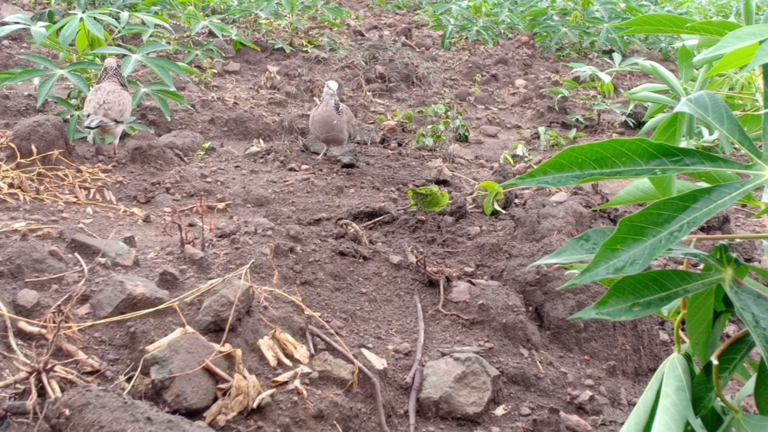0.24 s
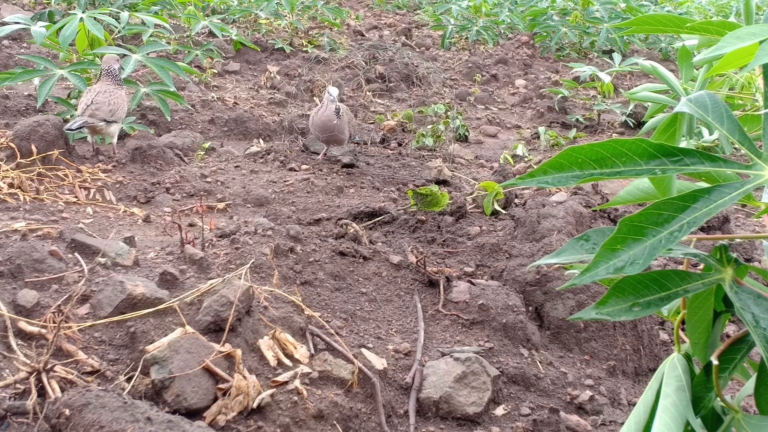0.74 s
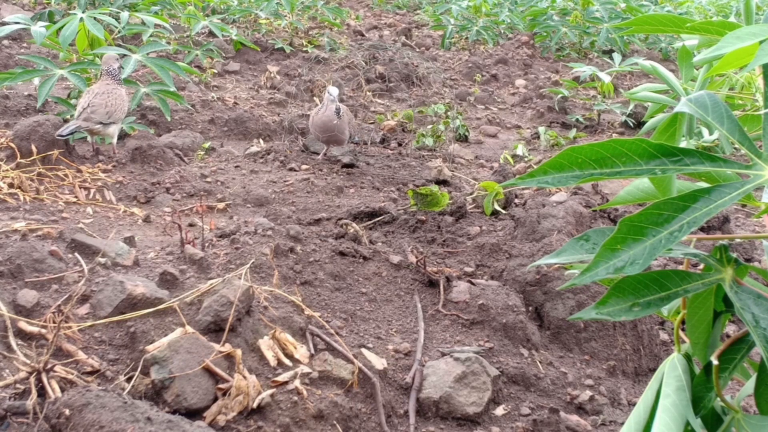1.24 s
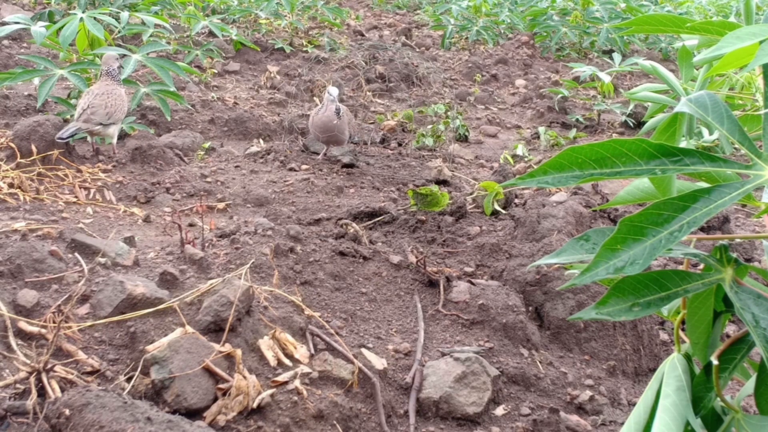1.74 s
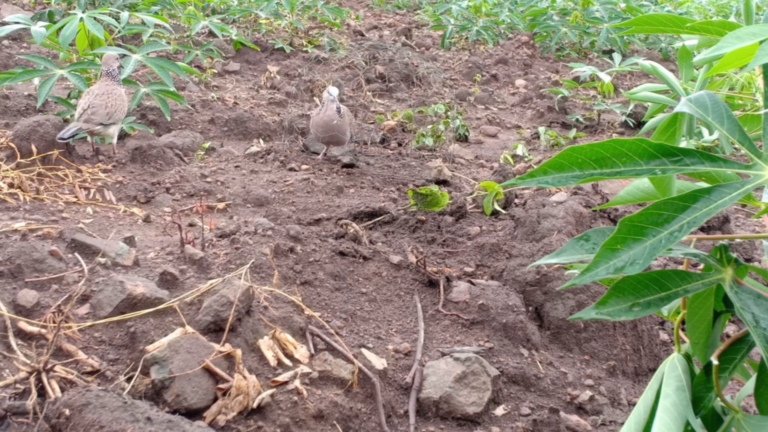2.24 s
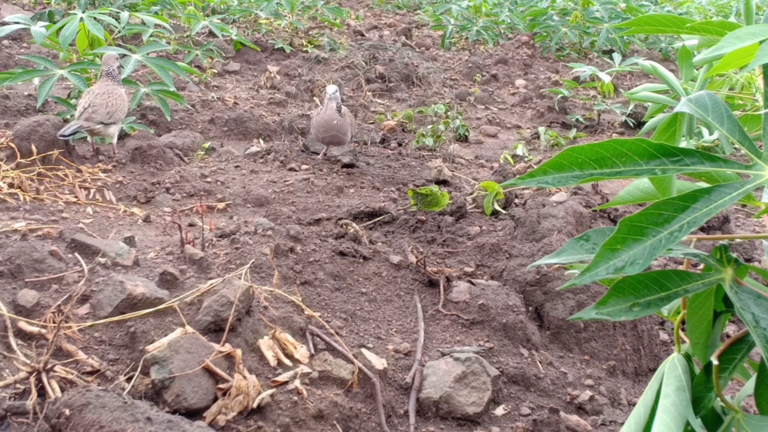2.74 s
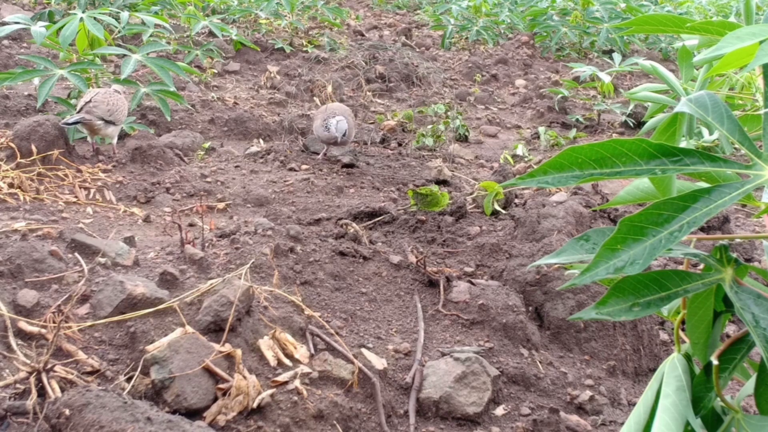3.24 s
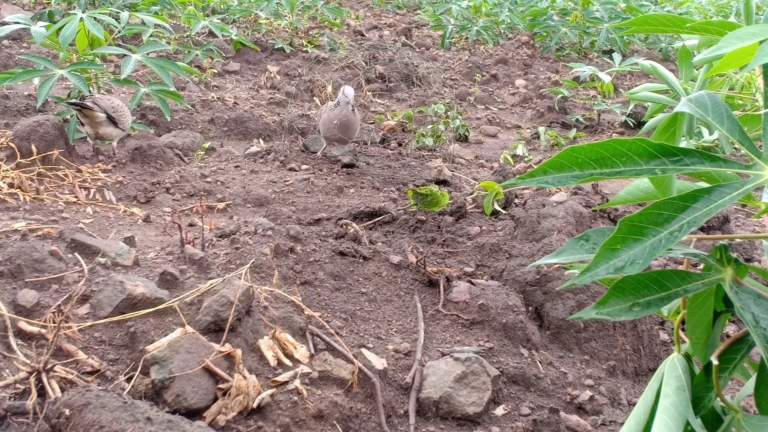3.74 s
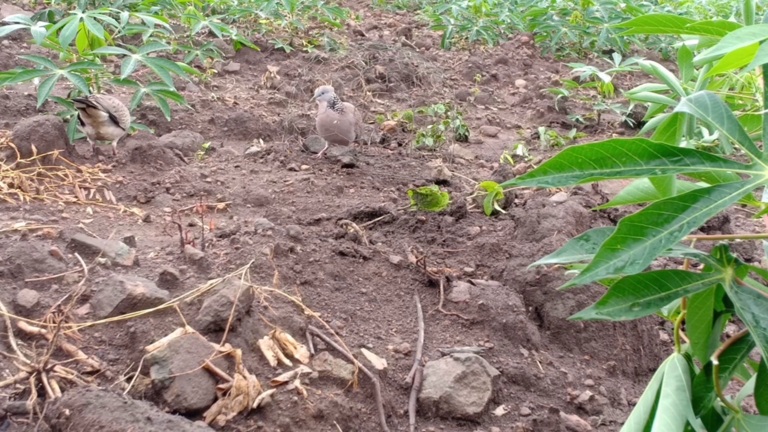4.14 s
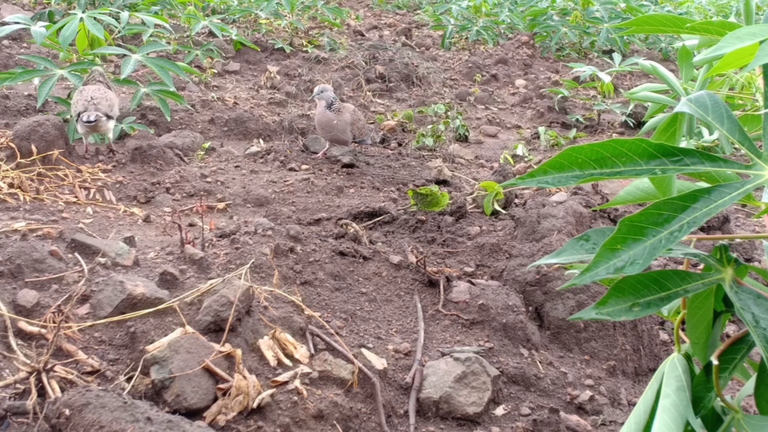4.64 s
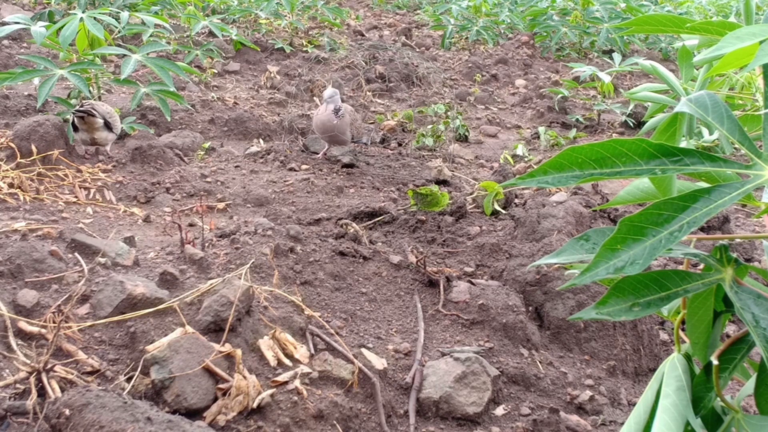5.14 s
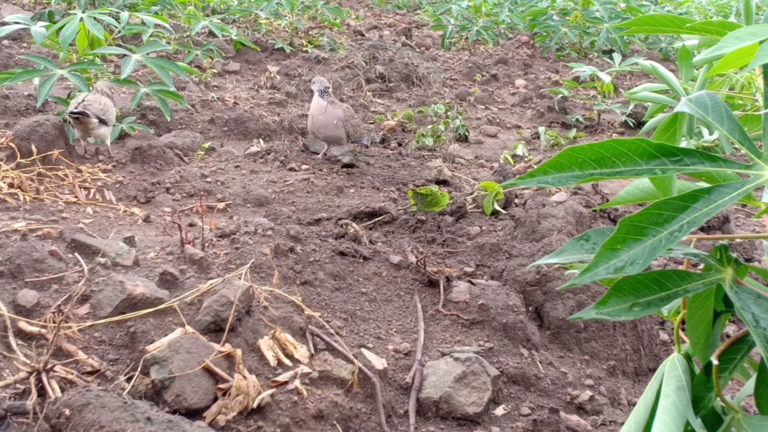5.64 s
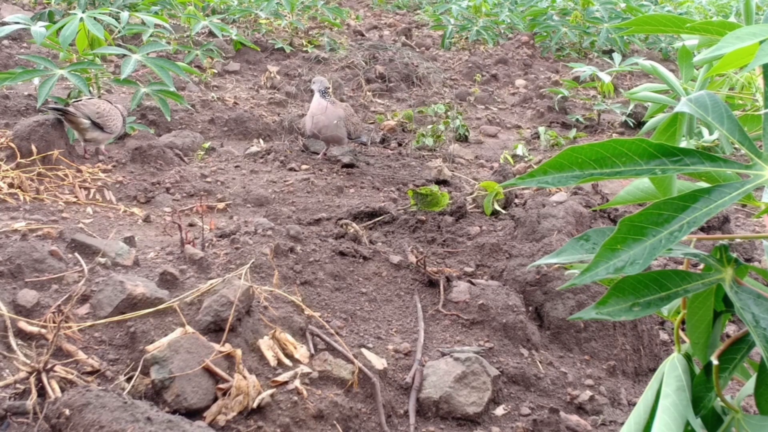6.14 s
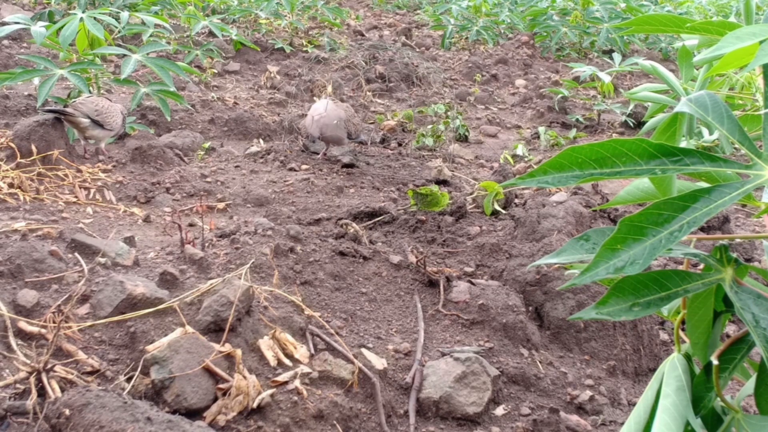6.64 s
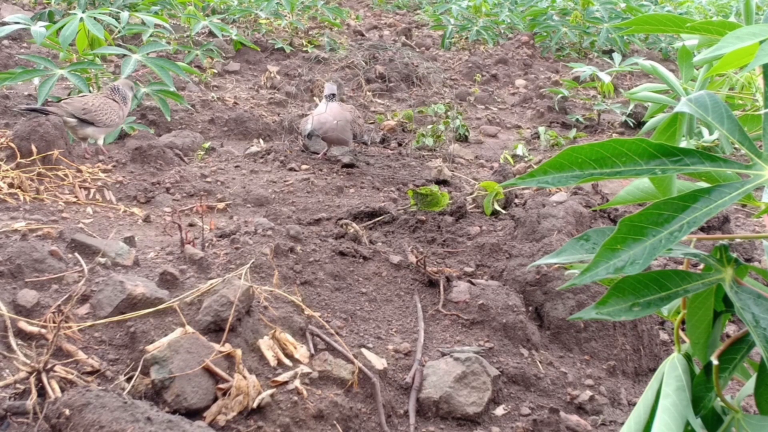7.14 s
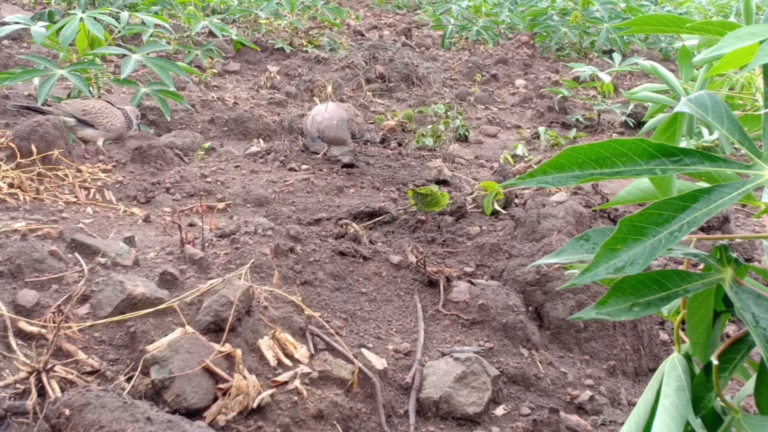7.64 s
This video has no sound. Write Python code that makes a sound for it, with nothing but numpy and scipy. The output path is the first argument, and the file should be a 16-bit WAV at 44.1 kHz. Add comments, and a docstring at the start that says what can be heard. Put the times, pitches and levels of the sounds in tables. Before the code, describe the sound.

In a quiet field, a dove a few metres from the microphone finishes a low coo. A bird further off gives a run of six falling chirps. The dove then starts again, cooing in fluttering pairs, short then long, and the falling chirps return over it near the end. Faint whistles, distant twittering and high insect trills sit slightly to the right, over a soft outdoor hush.

```python
"""Dove at the edge of a field

A few metres from a stereo microphone a dove coos in pairs, short then long, its syrinx fluttering on a
tone near 650 Hz. Further off a bird repeats a falling chirp that echoes among the plants, others whistle
and twitter faintly, and insects scrape their wings, mostly near 5 and 6 kHz, over the field's soft hush."""
import sys
import numpy as np
from scipy import signal
from scipy.fft import rfft, irfft, next_fast_len
from scipy.io import wavfile
from scipy.ndimage import uniform_filter1d, map_coordinates

SR = 44100
rng = np.random.default_rng(int(sys.argv[2]) if len(sys.argv) > 2 else 0)


def store_wav(level_fs):
    """Save 16-bit WAV to argv[1]."""
    pcm = np.round(np.clip(np.atleast_2d(level_fs), -1, 1) * 32767)
    wavfile.write(sys.argv[1], SR, pcm.T.astype(np.int16))


N = 347949
T = np.arange(N) / SR
FFT_SIZE = next_fast_len(N + SR // 2)


def undb(db):
    return 10 ** (np.asarray(db) / 20)


def band(x, hz, width_hz, passes=2):
    """A resonance applied several times over, gain 1 at the centre."""
    for _ in range(passes):
        x = signal.lfilter(*signal.iirpeak(hz, hz / width_hz, fs=SR), x)
    return x


def walk(rate):
    """Random levels held 1 / rate s and smoothed twice."""
    k = int(SR / rate)
    held = np.repeat(rng.standard_normal(N // k + 1), k)
    return uniform_filter1d(uniform_filter1d(held, k), k)[:N]


def gate(t, start, end, edge_s):
    """1 between the two times, with soft edges."""
    return np.clip(np.minimum(t - start, end - t) / edge_s + .5, 0, 1)


def add(out, s, sound):
    """Mixes a short sound in at time s."""
    part = out[max(int(s * SR), 0):][:len(sound)]
    part += sound[:len(part)]


def glide(s, hz, db):
    """A sine that follows a pitch and level curve."""
    t = np.arange(s[0], s[-1], 1 / SR)
    phase = 2 * np.pi * np.cumsum(np.interp(t, s, hz)) / SR
    return np.sqrt(2) * undb(np.interp(t, s, db)) * np.sin(phase)


def hush(level_db=-61.5):
    """Broad bands of far wind, leaves and insects; each swells slowly and flickers alone."""
    # Each row: frequency in Hz, relative spectral level in dB.
    spectrum = [(25, -10.5), (60, -8.5), (140, -1.5), (300, -7.5), (600, -5), (1350, -13.5), (2400, -8.5),
                (3000, -14), (4100, -20), (5300, -19.5), (6100, -16), (7300, -30), (9000, -34)]
    # Each row: frequency in Hz, left-right correlation, left minus right in dB.
    stereo_image = [(60, 0.7, -4), (230, 0.27, -2.5), (694, 0.026, -1), (5000, 0.19, -2)]
    log_f = np.log(np.fft.rfftfreq(FFT_SIZE, 1 / SR) + 1)
    hz, db = np.transpose(spectrum)
    colour = undb(np.interp(log_f, np.log(hz), db))
    hz, alike, pan_db = np.transpose(stereo_image)
    alike, pan_db = np.interp(log_f, np.log(hz), alike), np.interp(log_f, np.log(hz), pan_db)
    mid, side = rfft(rng.standard_normal((2, FFT_SIZE))) * colour * np.sqrt([1 + alike, 1 - alike])
    channels = np.array([mid + side, mid - side]) * undb([pan_db / 2, -pan_db / 2])
    out = 0
    for centre in np.arange(3, 11):
        share = np.cos(np.pi / 2 * np.clip(log_f - centre, -1, 1)) ** 2  # overlapping bands
        out += undb(.6 * walk(.7) + 1.3 * walk(9)) * irfft(channels * share, FFT_SIZE)[:, :N]
    return out / out.std() * undb(level_db)


def coo_contour(start, steady_from, steady_to, end, db, hz, onset_hz):
    """A coo rises, sags under the flutter, holds, then fades and drops; returns times, dB and Hz."""
    attack_s, release_s, step_s = .0197, .027, .0045
    sag_hz_per_s, fade_hz_per_s, fade_db_per_s = -93.5, -260, -38
    fade_s = max(end - release_s - steady_to, step_s)
    held_hz = hz + sag_hz_per_s * (steady_from - start)
    last_hz, last_db = held_hz + fade_hz_per_s * fade_s, db + fade_db_per_s * fade_s
    return np.transpose([
        (start, db - 6.5, onset_hz), (start + attack_s, db, hz), (steady_from, db, held_hz),
        ((steady_from + steady_to) / 2, db + 1.6, held_hz), (steady_to, db + 1.6, held_hz),
        (steady_to + step_s, db, held_hz), (steady_to + fade_s, last_db, last_hz),
        (steady_to + fade_s + release_s, last_db - 22, last_hz - 60.5)])


def dove():
    """The syrinx membranes nearly close once a flutter cycle and lose half a beat; the crop rings on."""
    # Each row is a coo: start, steady tone from, steady tone until and end in seconds,
    # level at the syrinx in dB, base pitch in Hz.
    coos = [ (-.3, -0.043, 0.077, .228, -32.5, 665.3), (3.721, 3.912, 3.898, 3.932, -35, 641),
            (4.062, 4.365, 4.41, 4.575, -32.5, 676), (4.853, 4.997, 5.042, 5.072, -33.5, 669),
            (5.189, 5.42, 5.565, 5.712, -33, 668.7), (6.065, 6.225, 6.247, 6.28, -33.5, 663),
            (6.395, 6.592, 6.669, 6.893, -33, 681), (7.273, 7.435, 7.453, 7.485, -34, 656.3),
            (7.591, 7.803, 7.99, 8.12, -33.5, 670.8)]
    opening_flutter_hz, short_flutter_hz, long_flutter_hz = (59, 78.57), (94, 106.6), (104.73, 109.1)
    opening_s, loosen_s, murmur_s = .16, .12, .015
    onset_hz, murmur_hz = 529.6, 446.5
    out = np.zeros(N)
    for start, steady_from, steady_to, end, coo_db, coo_hz in coos:
        s, db, hz = coo_contour(start, steady_from, steady_to, end, coo_db, coo_hz, onset_hz)
        t = np.arange(start, s[-1], 1 / SR)
        age = t - start
        long = s[-1] - start > .4
        slow = long & (age < opening_s)  # long coos open with a slower flutter
        rate = np.interp(t, s[[0, -1]], long_flutter_hz if long else short_flutter_hz)
        rate = np.where(slow, np.interp(age, [0, opening_s], opening_flutter_hz), rate)
        rate *= 1 + .13 * walk(70)[:len(t)]
        cycles = np.cumsum(rate) / SR
        size, bend, leak, slip = rng.standard_normal((4, 100))
        closure, burst = np.round(cycles).astype(int), cycles.astype(int)
        # the membranes stay ajar in the steady stretch, bar the odd closure, and leak on either side
        steady = gate(t, steady_from, steady_to, .0067) * (steady_to > steady_from)
        steady *= .85 * np.where(leak[closure] < -.55, .33, 1)
        loose_times = [steady_from - loosen_s, steady_from, steady_to, steady_to + loosen_s]
        loose = np.interp(t, loose_times, [.15, .28, .4, .26]) * (1 + 1.2 * leak[closure])
        past_opening = closure > cycles[slow].max(initial=0)
        ajar = np.maximum(steady, np.clip(loose, 0, .9) * past_opening)
        wobble = undb(1.4 * walk(70)[:len(t)])
        swing = np.sin(np.pi * cycles) ** 2
        sharpness = np.interp(age, [opening_s - .0045, opening_s], [.9 if long else .55, .55])
        flow = ajar * wobble + (1 - ajar) * undb(1 + .44 * size[burst]) * swing ** sharpness
        pitch = np.interp(t, s, hz) * (1 + .012 * walk(75)[:len(t)] * ajar + .022 * bend[burst])
        pitch *= 1 + np.where(slow, .14, .08) * (cycles % 1 - .5) * (1 - ajar)  # each burst bends up
        # a leaky closure keeps the beat: the tone sits higher at first and lower in the fade
        keeps_beat = uniform_filter1d(np.clip((ajar - .2) / .15, 0, 1), SR // 200)
        pitch += np.where(t < steady_to, 1, -1) * keeps_beat * .27 * rate
        # a tight closure swallows about half a cycle of the tone
        closing = (1 - swing) ** 4 * 128 / 35  # averages 1
        lost_hz = (.5 + .12 * slip[closure]) * (1 - keeps_beat) * rate * closing
        tone = np.sqrt(2) * np.sin(2 * np.pi * np.cumsum(pitch - lost_hz) / SR)
        call = undb(np.interp(t, s, db)) * flow * tone
        add(out, start, call[t >= 0])
        if start > 0:  # a faint low murmur leads in
            murmur_db = coo_db - 19.5 + np.array([-12, 0, -8])
            murmur = glide([0, murmur_s / 2, murmur_s], [murmur_hz, murmur_hz, onset_hz], murmur_db)
            add(out, start - murmur_s, murmur)
    crop = band(out, 712, 790)
    air_rush = band(np.abs(out) * rng.standard_normal(N), 1000, 300)
    return undb(6) * crop + undb(-13) * air_rush


def twitter(low_hz, octaves, db, count, from_s=0):
    """Many far birds: tiny slides at random moments, most of them barely above the hush."""
    out = np.zeros(N)
    for when, height, slide, length, loud in rng.random((count, 5)):
        hz = low_hz * 2 ** (octaves * height) * (1 - slide * np.array([0, .1, .2]))
        length_s = .015 + .04 * length
        note = glide([0, length_s / 2, length_s], hz, np.array([-12, 0, -12]) + db - 1.3 * np.log(loud))
        add(out, from_s + when * (T[-1] - from_s), note)
    return out


def high_trills(group_s=.071, stroke_s=.017):
    """An insect near 6 kHz: falling strokes in threes, each lower than the last."""
    # Each row: start and end of a trill in seconds.
    spans = [(.1, .22), (.42, .56), (1.135, 1.55), (1.91, 2.02), (2.32, 2.45), (3.165, 3.5), (3.585, 3.72),
             (3.9, 4.05), (5.0, 5.15), (5.25, 5.6), (5.92, 6.02), (7.5, 7.89)]
    hz, db = np.array([6180, 5950, 5650]), np.array([-78, -69, -78])
    out = np.zeros(N)
    for start, end in spans:
        for s, jitter in zip(np.arange(start, end, group_s), rng.standard_normal((10, 3))):
            for k in range(3):
                stroke = glide([0, .012, .026], hz - 90 * k, db + 2 * jitter[k])
                add(out, s + (k + .22 * jitter[k - 1]) * stroke_s, stroke)
    return out * undb(5 * walk(400))


def wing_trill(spans, hz, stroke_hz, db, buzz=0):
    """Wing strokes: puffs of scraping that ring a narrow resonance, over a share of unbroken buzz."""
    cycles = np.cumsum(stroke_hz * (1 + .12 * walk(14))) / SR
    scrape = (buzz + np.sin(np.pi * cycles) ** 2) * rng.standard_normal(N)
    ring = band(scrape, hz, width_hz=200)
    singing = sum(gate(T, start, end, .037) for start, end in spans)
    return ring / ring.std() * undb(db + 2 * walk(25)) * singing


def low_trills():
    """Two lower insects scrape their wings: one in bouts of short buzzes, a deeper one in slow pulses."""
    # Each row: start and end of a bout, then time from trill to trill, all in seconds.
    bouts = [(.12, .8, .3), (1.28, 1.6, .3), (2.46, 3.85, .34), (4.43, 4.8, .297), (5.3, 5.95, .31),
             (6.44, 7.5, .325)]
    # Each row: start and end of a deep trill in seconds.
    deep_spans = [(6.45, 6.7), (6.9, 7.25), (7.5, 7.8)]
    short_spans = [(s, s + .13) for bout in bouts for s in np.arange(*bout)]
    return (wing_trill(short_spans, hz=4890, stroke_hz=66, db=-79.5, buzz=.6)
            + wing_trill(deep_spans, hz=3780, stroke_hz=17, db=-78))


def chirps(lift_from_hz=2500, ground_lag_s=.00289, ground_db=-7):
    """Each chirp falls fast and levels out; the ground mirrors it, air among the plants makes it waver."""
    # Each row: start in seconds, level in dB, lift of the low end in dB.
    calls = [(.257, -50, -3), (.591, -47.5, 1), (.923, -46.5, 1), (1.249, -44.5, 0), (1.579, -44.5, 0),
             (1.913, -43.5, 0), (5.633, -57, 0), (5.953, -52, 3), (6.275, -47, 6), (6.604, -47, 6),
             (6.943, -47, 6), (7.274, -47, 6)]
    # Each row: seconds into the chirp, pitch in Hz, relative level in dB.
    contour = [(0, 3250, -14), (.007, 2850, -3), (.018, 2550, -2), (.031, 2270, 2), (.042, 1900, -10),
               (.051, 1680, -14), (.072, 1640, -18), (.094, 1680, -27)]
    s, hz, db = np.transpose(contour)
    low_end = np.clip((lift_from_hz - hz) / (lift_from_hz - hz.min()), 0, 1)
    out = np.zeros(N)
    for (start, level_db, lift_db), bend in zip(calls, rng.standard_normal(len(calls))):
        add(out, start, glide(s, hz * (1 + .0032 * bend), db + level_db + lift_db * low_end))
    mirrored = undb(ground_db) * np.roll(out, round(ground_lag_s * SR))
    return (out - mirrored) * undb(2.5 * walk(160))


def insect_phrases(db=-60.5):
    """Nine quick soft strokes lead up to four strong ones; every stroke slides down."""
    # Each entry: time of a phrase's first strong stroke in seconds.
    starts = [.763, 2.74, 4.611, 6.425]
    out = np.zeros(N)
    for start in starts:
        for k, (late, loud) in enumerate(rng.standard_normal((9, 2))):  # counted backwards
            soft_db = np.array([-14, 0, -14]) + db - .5 - .32 * k + 2 * loud
            stroke = glide([0, .007, .016], [6250, 6050, 5850], soft_db)
            add(out, start - .058 - .046 * k + .003 * late, stroke)
        for k in range(4):  # a weak stroke comes just before each strong one
            for lag_s, top_hz, low_hz, gain_db in [(-.016, 6470, 6420, -10), (0, 6370, 5746, 7)]:
                hz = np.linspace(top_hz, low_hz, 3)
                stroke = glide([-.003, .006, .017], hz, np.array([-14, 0, -16]) + db + gain_db)
                add(out, start + .0765 * k + lag_s, stroke)
    return out


def far_coos_and_whistles():
    """The soft coos of a far dove and thin whistles of other birds, wavering in moving air."""
    # Each row of both: start and end in seconds, first and last pitch in Hz, level in dB.
    coos = [(.41, 0.511, 519, 460, -61), (.56, 0.63, 500, 470, -68), (5.08, 5.182, 529, 517, -64.5),
            (5.73, 5.834, 512, 489, -66.5)]
    whistles = [(1.09, 1.18, 3200, 3430, -68), (1.32, 1.355, 3600, 3450, -67),
                (1.44, 1.57, 3160, 3190, -60), (1.699, 1.793, 3130, 2940, -66.5),
                (2.055, 2.128, 2430, 2350, -65), (2.255, 2.335, 2877, 2880, -67),
                (2.57, 2.714, 3550, 3120, -71), (2.96, 3.155, 2985, 3040, -63),
                (3.145, 3.26, 3010, 3030, -70), (3.255, 3.393, 3400, 2920, -72),
                (3.46, 3.61, 2720, 2860, -67), (7.27, 7.36, 3170, 3350, -65.5),
                (7.385, 7.426, 4620, 4140, -70), (7.608, 7.645, 4520, 4480, -64.5),
                (7.82, 7.86, 4550, 4100, -68)]
    out = np.zeros(N)
    for start, end, first_hz, last_hz, db in whistles + coos:
        s = [0, .015, end - start - .015, end - start]
        add(out, start, glide(s, [first_hz, first_hz, last_hz, last_hz], [db - 15, db, db, db - 16]))
    drift = np.arange(N) + .00004 * SR * walk(70)  # moving air stretches the path
    return map_coordinates(out, [drift], mode="nearest") * undb(2.5 * walk(40))


def ticks(decay_s=.0072):
    """Dry ticks close to the microphone, a few milliseconds of bright noise each."""
    # Each row: start in seconds, level before filtering in dB.
    cracks = [(1.0114, -53), (1.059, -55), (1.801, -55), (2.278, -55), (5.484, -56), (5.7627, -53)]
    envelope = np.exp(-np.arange(300) / SR / decay_s)
    out = np.zeros(N)
    for s, db in cracks:
        add(out, s, undb(db) * rng.standard_normal(len(envelope)) * envelope)
    return band(out, 4800, 4000, passes=3)


def far_chirps():
    """A second bird's crisp downward flicks, and thin distant calls that leap up and slide down."""
    # Each entry of both: start of a call in seconds.
    flick_starts = [2.645, 2.998, 3.351, 3.691, 4.053]
    arch_starts = [2.36, 2.6, 2.84, 3.05, 3.27]
    # Each row of both: seconds into the call, pitch in Hz, level in dB.
    flick = [(0, 3100, -74), (.026, 2520, -60), (.045, 2150, -72), (.066, 1850, -74)]
    arch = [(0, 3700, -83), (.015, 4550, -73), (.05, 3300, -82)]
    out = np.zeros(N)
    for starts, contour in [(flick_starts, flick), (arch_starts, arch)]:
        for start in starts:
            add(out, start, glide(*np.transpose(contour)))
    return out * undb(3.5 * walk(150))


def place(x, pan_db, left_lag_s, echo_db, t60_s, leaves_hz=100.):
    """Direct sound (pan_db is left minus right) plus scatter from leaves and ground, unlike each side."""
    t = np.arange(SR // 2) / SR
    tail = rng.standard_normal((2, len(t))) * np.exp(-np.log(1000) * t / t60_s)
    tail *= np.minimum(t / .0023, 1)
    tail /= np.sqrt(np.sum(tail ** 2) / 2)
    swayed = np.interp(T + .0002 * walk(120), T, x)  # the leaves move, so no two echoes ring alike
    f = np.fft.rfftfreq(FFT_SIZE, 1 / SR)
    direct = rfft(x, FFT_SIZE) * np.exp(-2j * np.pi * f * np.array([[left_lag_s], [0]]))
    low_cut = f ** 4 / (f ** 4 + leaves_hz ** 4)  # leaves scatter little below their own pitch
    scatter = undb(echo_db) * rfft(swayed, FFT_SIZE) * rfft(tail, FFT_SIZE) * low_cut
    return undb([[pan_db / 2], [-pan_db / 2]]) * irfft(direct + scatter, FFT_SIZE)[:, :N]


def scene():
    """The field from the microphone: birds and insects off to the right, the hush all round."""
    insects = insect_phrases() + high_trills() + low_trills()
    out = place(chirps(), pan_db=-6.5, left_lag_s=-.00013, echo_db=.57, t60_s=.4, leaves_hz=2370.)
    out += place(far_chirps(), pan_db=-4, left_lag_s=0, echo_db=-9.5, t60_s=.2)
    birds = twitter(low_hz=2100, octaves=.7, db=-75, count=400)
    birds += twitter(low_hz=2600, octaves=.8, db=-75.5, count=110, from_s=6.38)  # a flock joins in
    out += place(dove(), pan_db=-4, left_lag_s=.00003, echo_db=-12, t60_s=.19)
    out += place(birds, pan_db=-7.5, left_lag_s=.00027, echo_db=-1, t60_s=.14)
    out += place(far_coos_and_whistles(), pan_db=-10.5, left_lag_s=.00026, echo_db=-4, t60_s=.33)
    out += place(insects, pan_db=-9.5, left_lag_s=.00041, echo_db=-6, t60_s=.18)
    out += place(ticks(), pan_db=-.5, left_lag_s=0, echo_db=2.2, t60_s=.025)
    return out + hush()


def record(dry):
    """Microphone hiss, a small offset and a steep top cut."""
    offset, top_hz = .0011, 15480
    hiss = rng.standard_normal((2, N)) * undb([[-78], [-76.5]])
    return signal.sosfilt(signal.ellip(10, .2, 70, top_hz, fs=SR, output="sos"), dry + hiss + offset)


dry = scene()
out = record(dry)
store_wav(out)
```